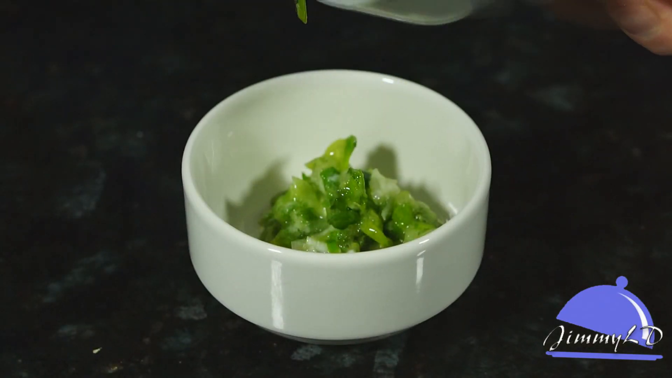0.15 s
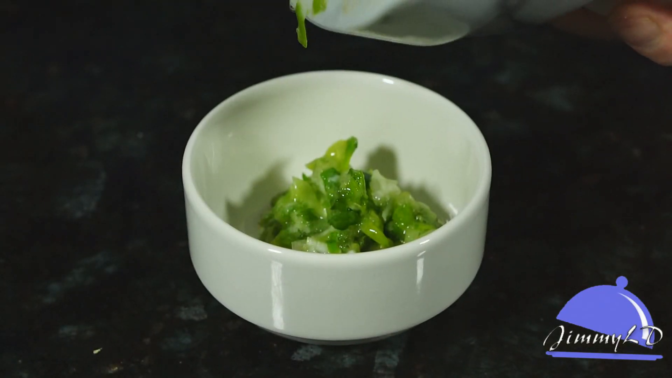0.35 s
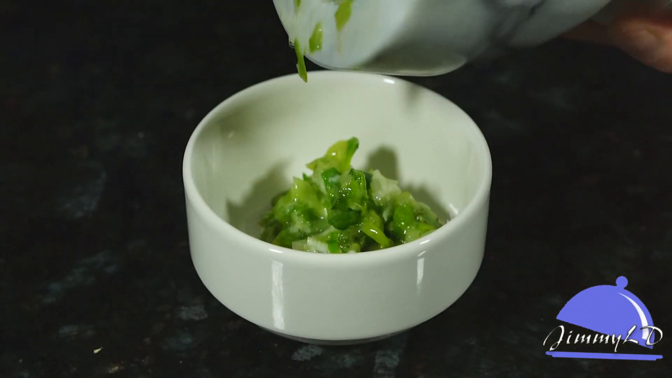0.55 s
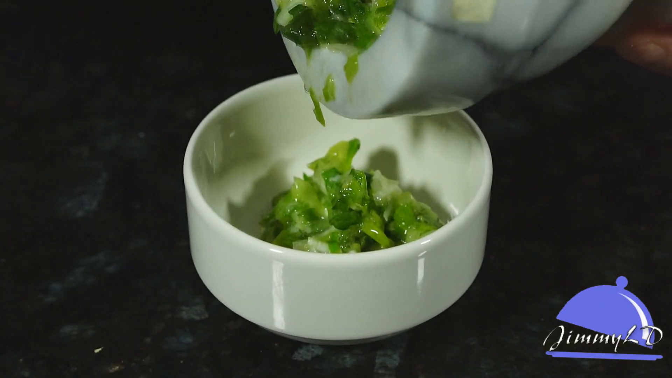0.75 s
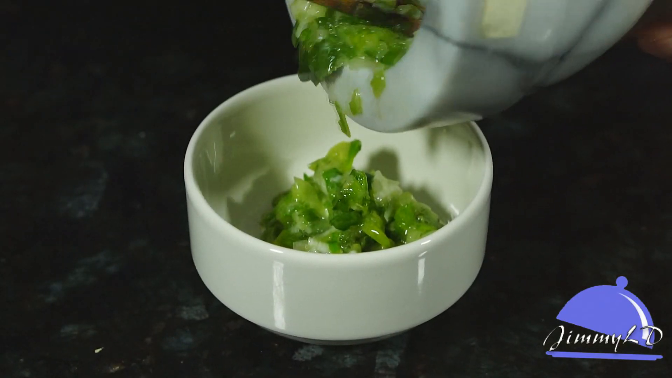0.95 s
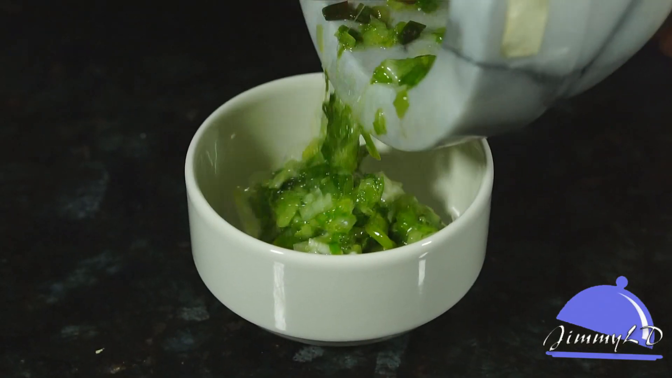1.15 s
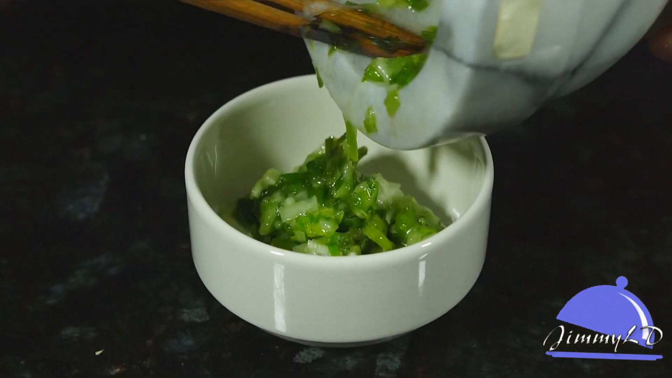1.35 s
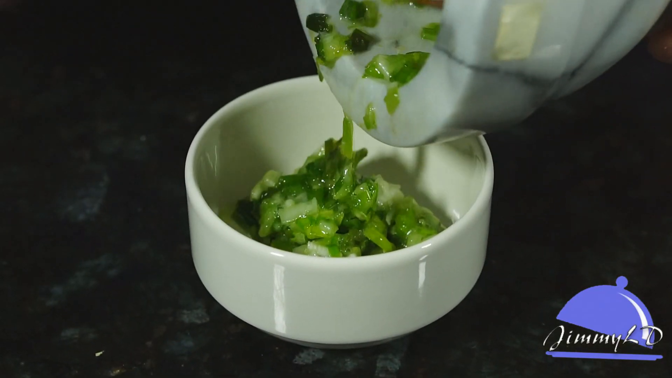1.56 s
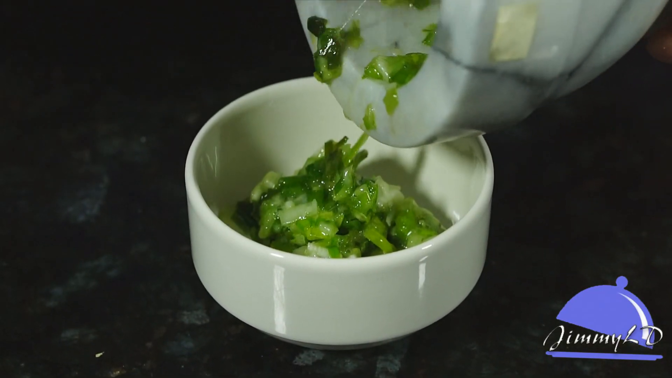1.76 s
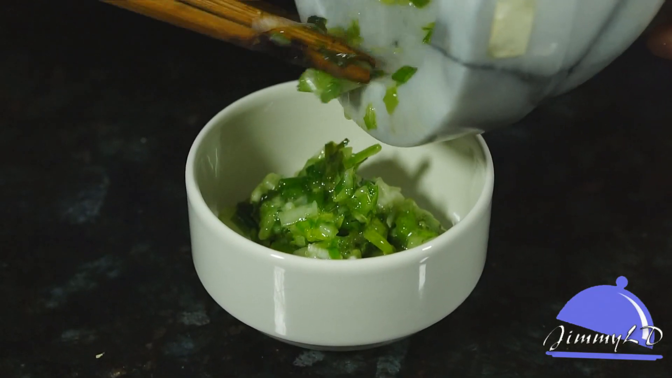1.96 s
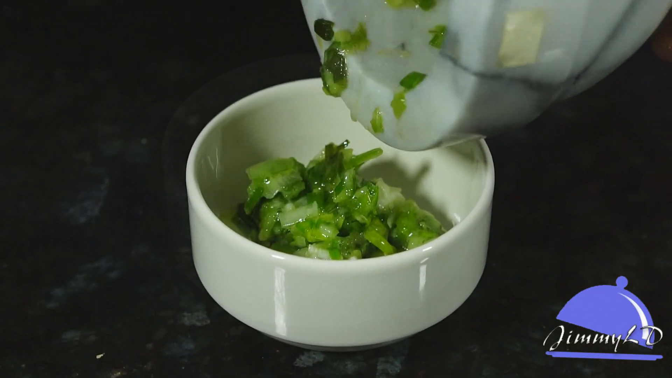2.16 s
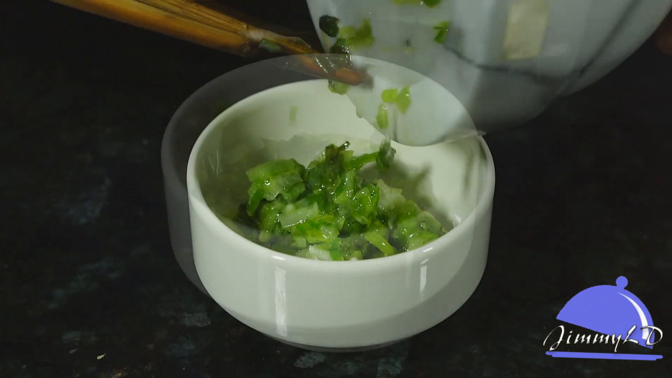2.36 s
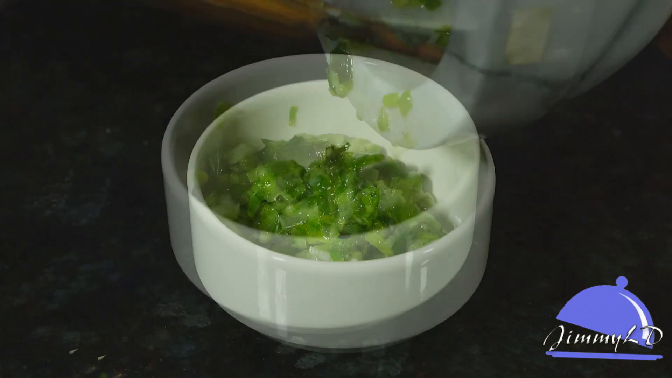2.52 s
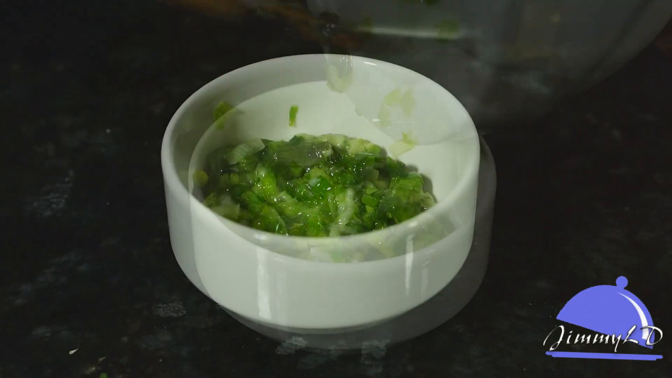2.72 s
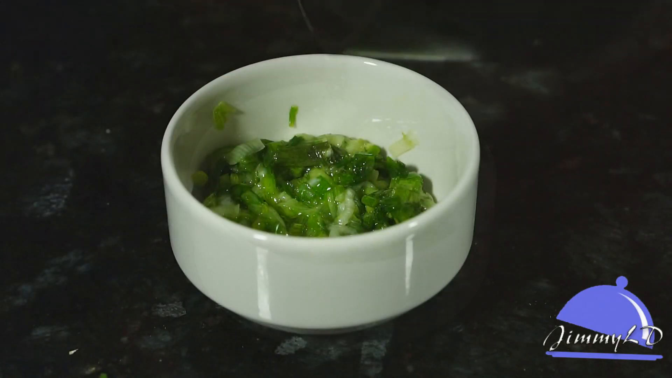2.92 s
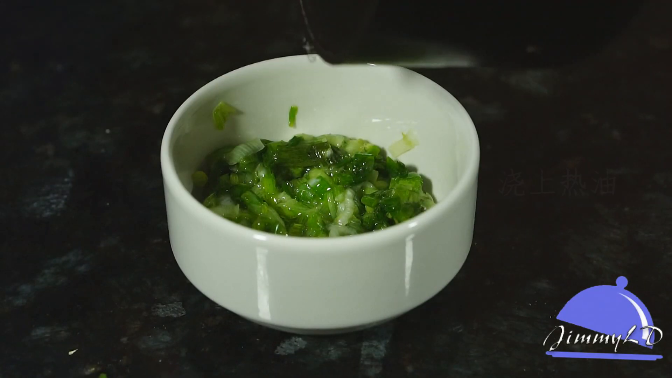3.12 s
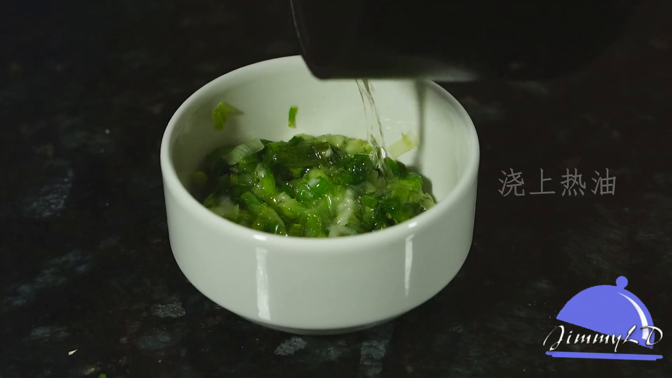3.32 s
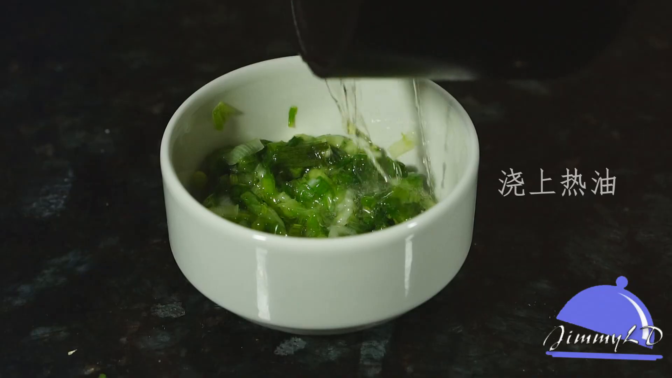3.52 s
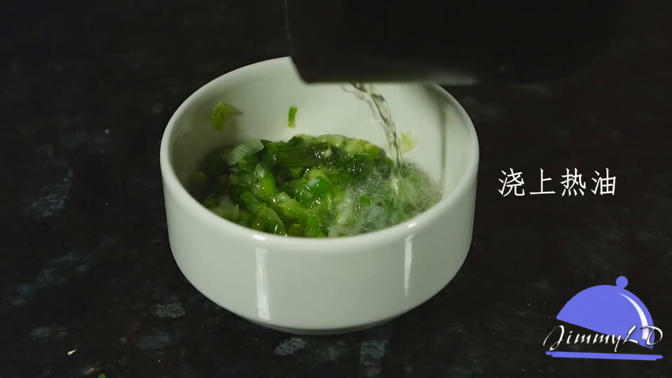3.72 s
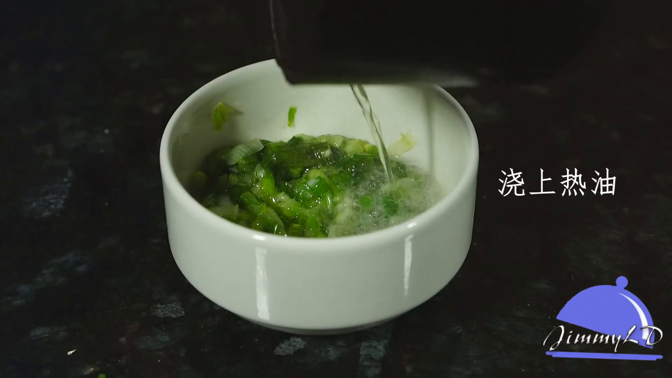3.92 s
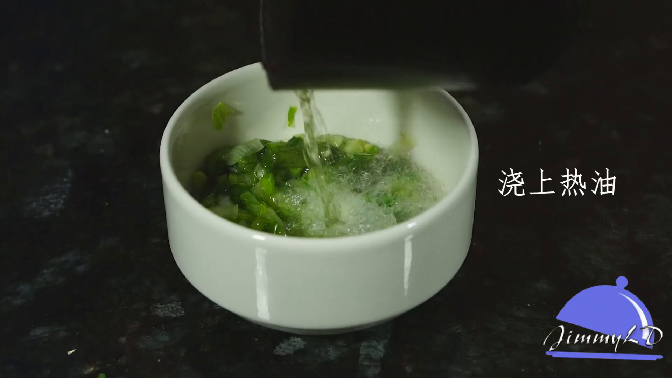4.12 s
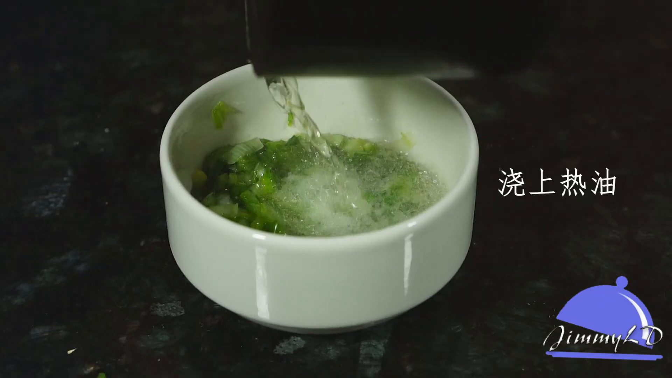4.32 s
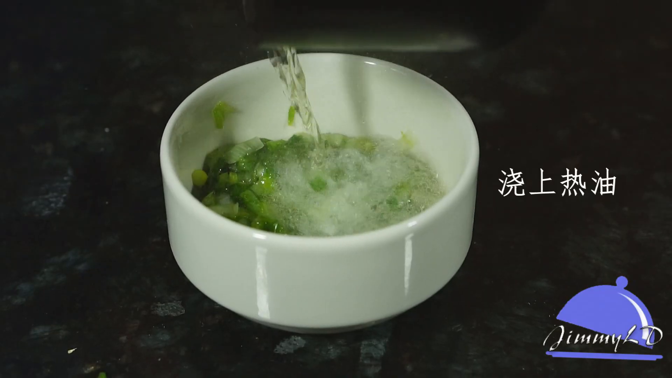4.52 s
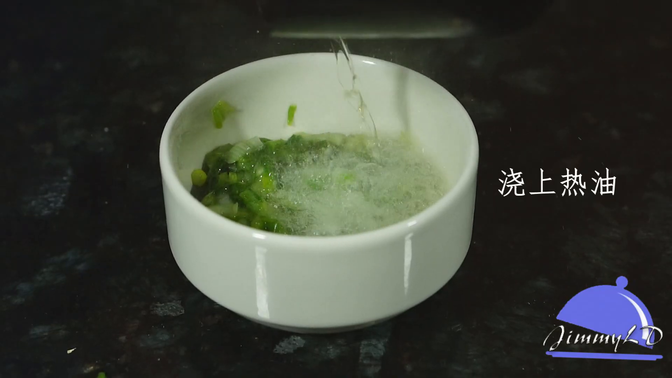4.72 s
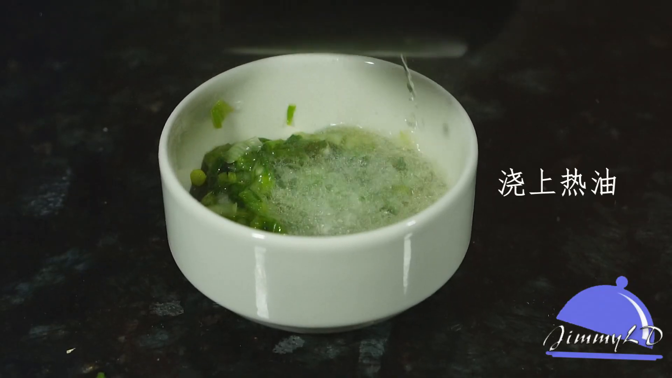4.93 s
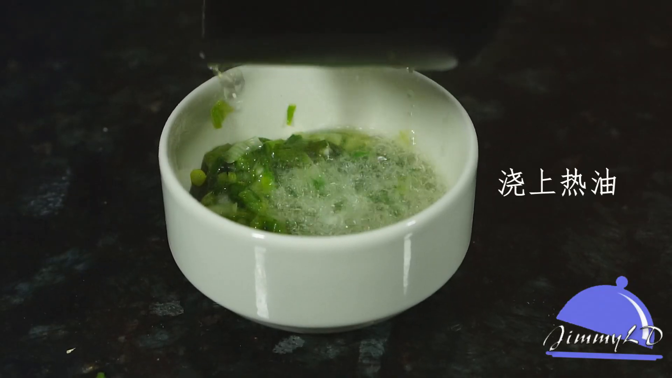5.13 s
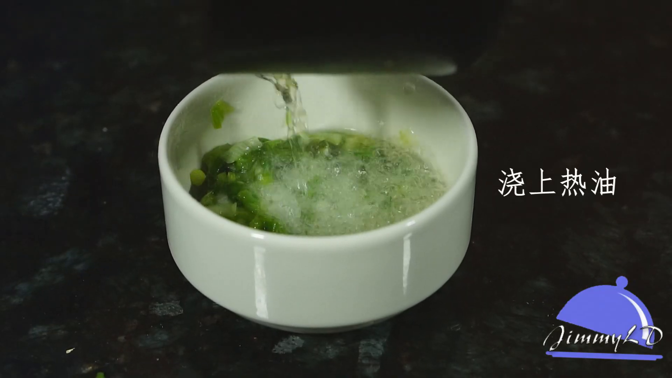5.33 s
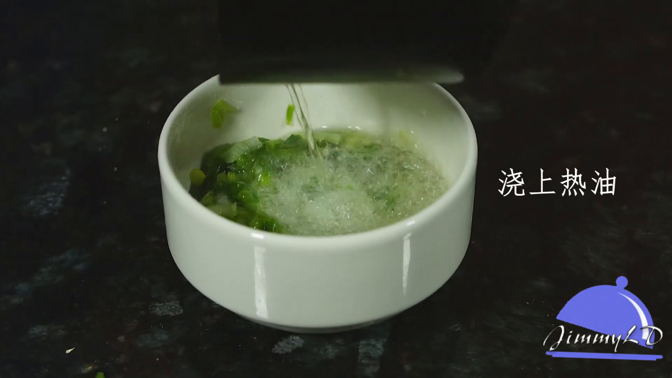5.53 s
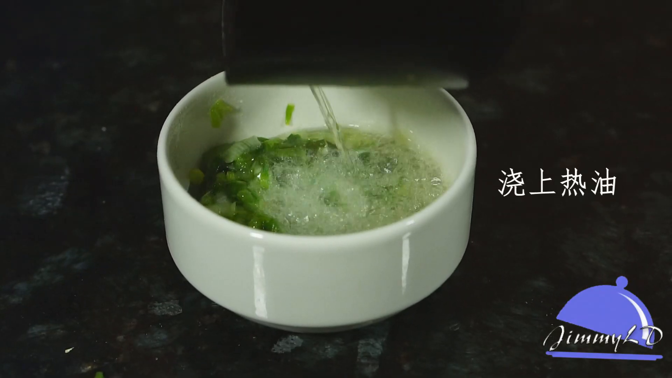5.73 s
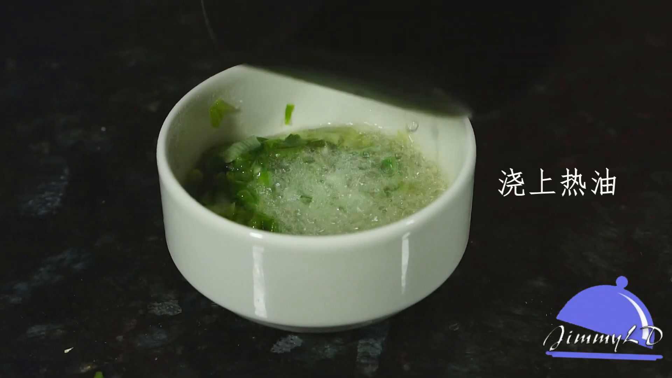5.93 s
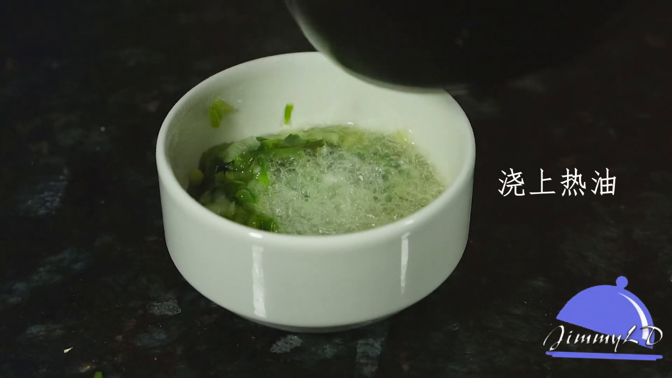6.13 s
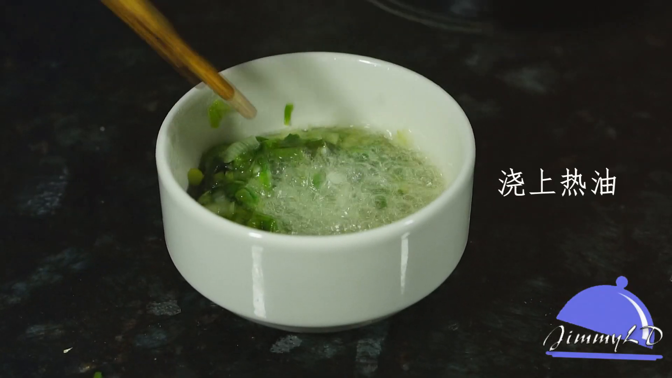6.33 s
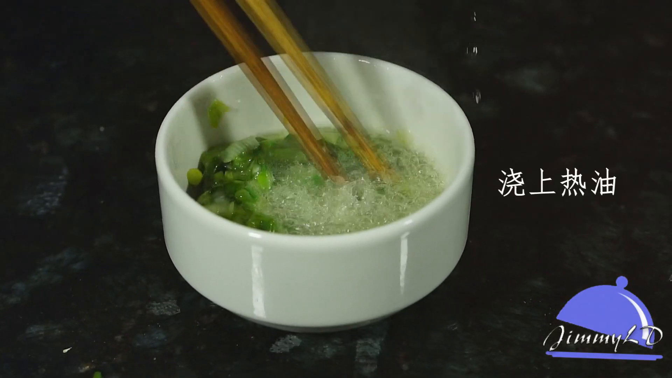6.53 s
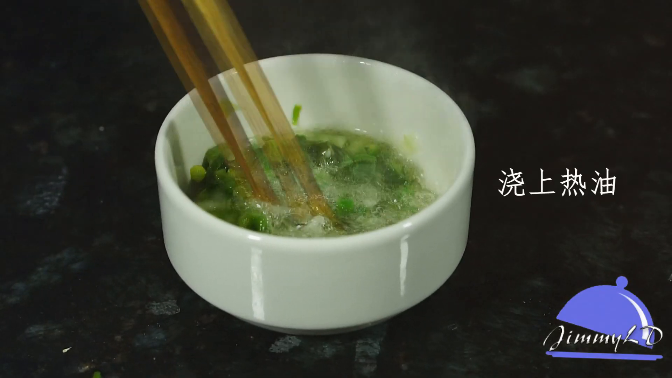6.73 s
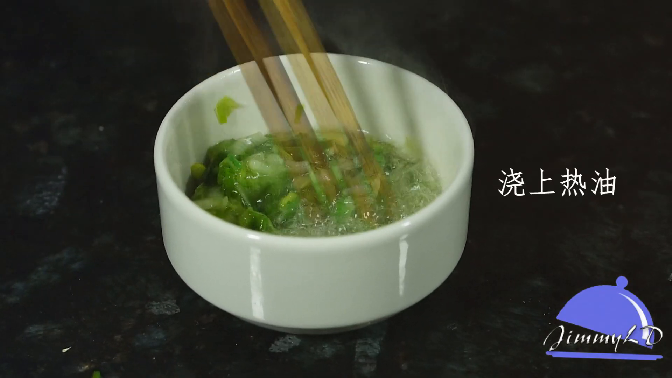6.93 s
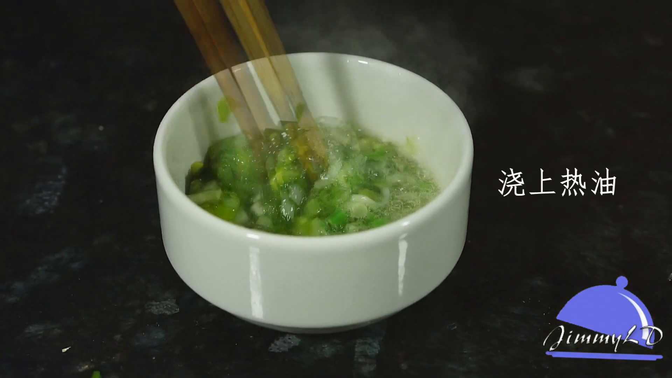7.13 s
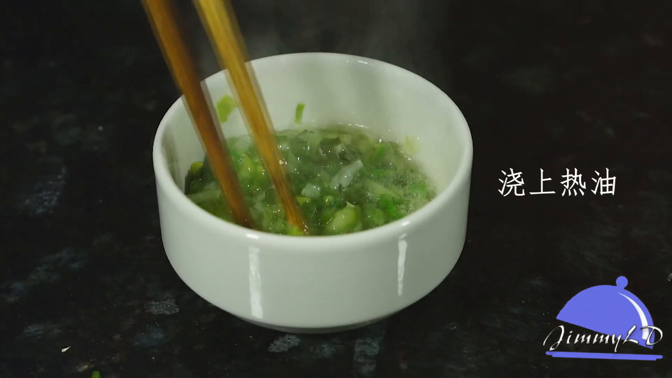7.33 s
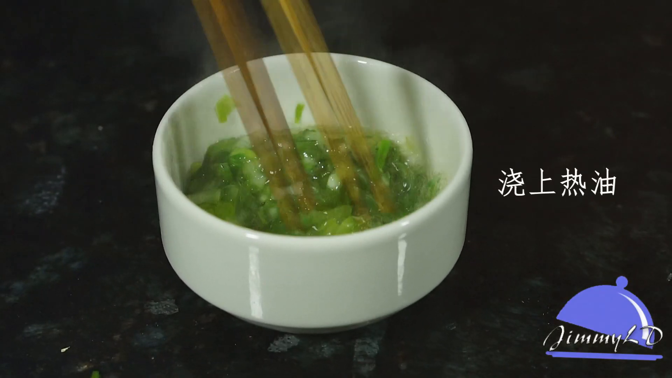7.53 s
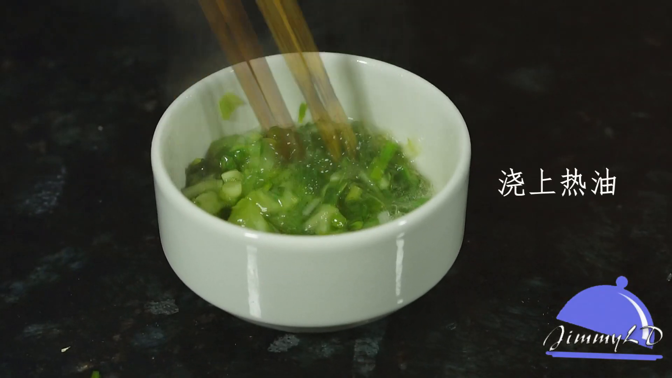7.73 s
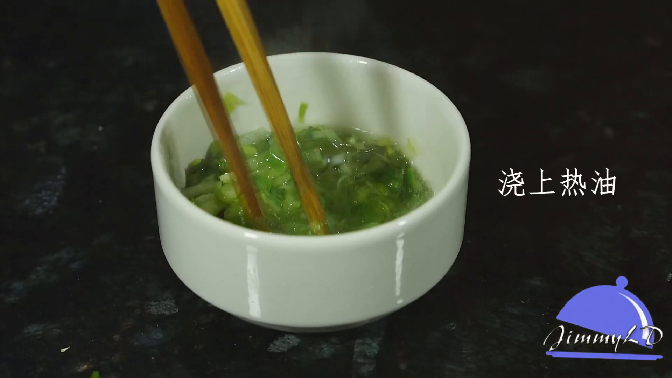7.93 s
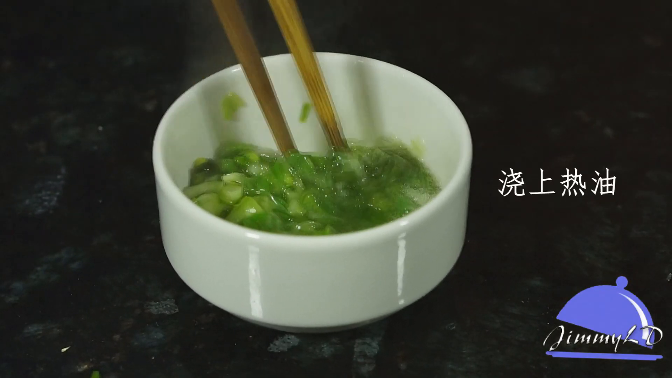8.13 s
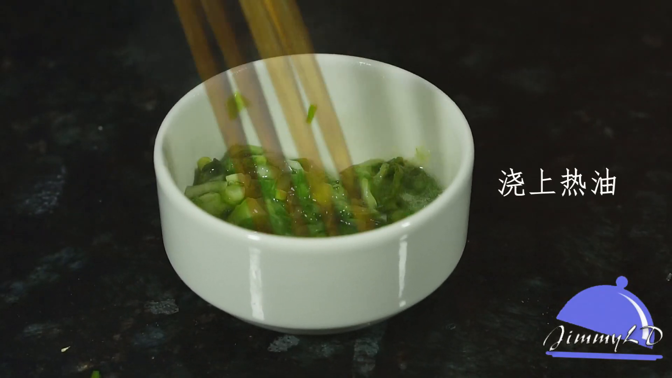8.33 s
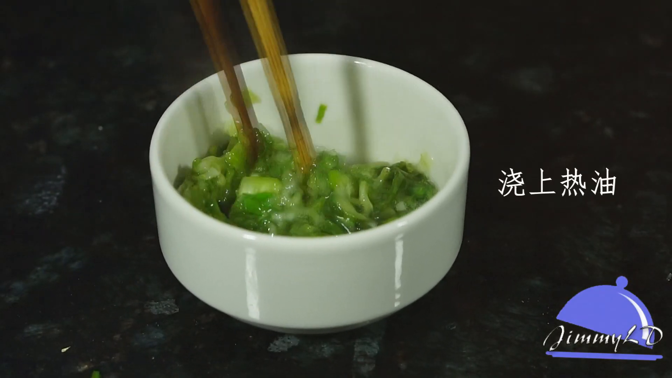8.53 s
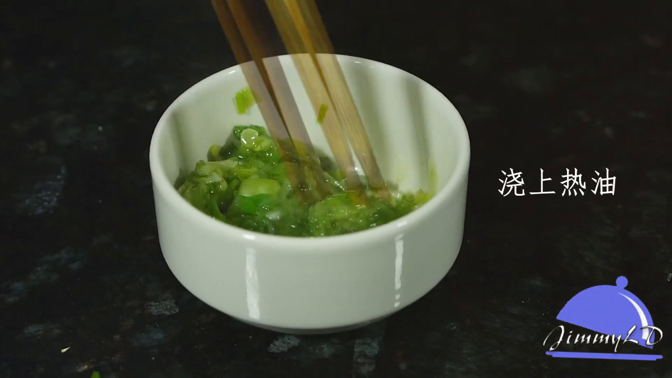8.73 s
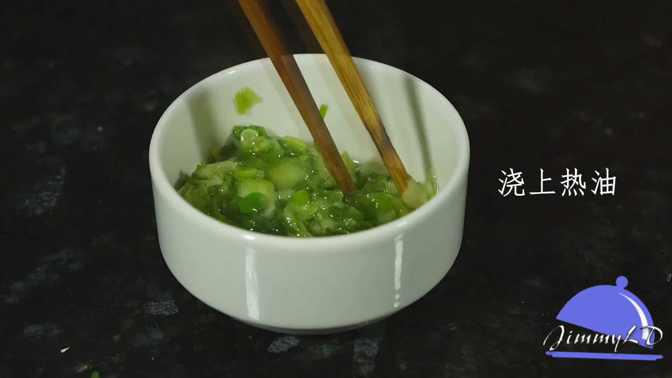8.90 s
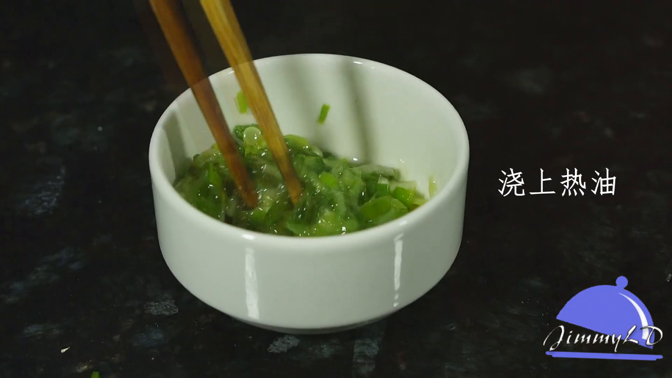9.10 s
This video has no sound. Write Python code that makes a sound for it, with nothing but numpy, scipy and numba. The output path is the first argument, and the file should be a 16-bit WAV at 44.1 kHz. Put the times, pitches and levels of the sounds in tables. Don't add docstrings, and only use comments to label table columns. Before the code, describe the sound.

Wooden sticks knock and scrape a stone mortar over a ringing porcelain bowl, then hot oil sizzles fiercely, spits and fades as it is stirred.

```python
import sys
import numpy as np
from scipy import signal
from scipy.fft import rfft, irfft
from scipy.io import wavfile
from scipy.ndimage import uniform_filter1d
from numba import njit

SR = 44100
rng = np.random.default_rng(int(sys.argv[2]) if len(sys.argv) > 2 else 0)


def log_audio(samples):
    frames = np.atleast_2d(samples).T
    limited = np.clip(frames, -1, 1)
    pcm = np.round(limited * 32767).astype(np.int16)
    wavfile.write(sys.argv[1], SR, pcm)


def nominal_scale(level):
    x = np.asarray(level, float) / 20
    return 10 ** x


N = 408354
HZ = np.arange(N // 2 + 1) * SR / N
T = np.arange(N) / SR
RISE_S = 0.0007


def over_hz(table):
    hz, value = np.transpose(table)
    return np.interp(np.log(HZ + 1), np.log(hz), value)


def over_time(table):
    return np.interp(T, *np.transpose(table))


def unit(x):
    return x / np.sqrt(np.mean(x ** 2))


def noise(own):
    return rng.standard_normal(N) + own * rng.standard_normal((2, N))


def colour(x, spectrum, peaks=(), peak_db=0):
    X = rfft(x)
    power_in = np.mean(abs(np.atleast_2d(X)) ** 2, axis=0)
    flat = np.sqrt(uniform_filter1d(power_in, size=250))
    power = nominal_scale(2 * over_hz(spectrum))
    for hz, width_hz, db in peaks:
        power = power + nominal_scale(2 * (db + peak_db)) / (1 + (2 * (HZ - hz) / width_hz) ** 2) ** 2
    return unit(irfft(X * np.sqrt(power) / flat, N))


def bands(x, edges_hz):
    X = rfft(x)
    below = [1 / (1 + (HZ / hz) ** 6) for hz in edges_hz]
    return [irfft(X * (hi - lo), N) for lo, hi in zip([0] + below, below + [1])]


def walk(rate_hz):
    hold = int(SR / rate_hz)
    steps = np.repeat(rng.standard_normal(N // hold + 1), hold)
    return 1.24 * uniform_filter1d(uniform_filter1d(steps, hold), hold)[:N]


@njit
def rings(s, hz, t60, size, pan):
    out = np.zeros((2, N))
    for k in range(len(s)):
        i = int(s[k] * SR)
        z = size[k] + 0j
        turn = np.exp((2j * np.pi * hz[k] - np.log(1000) / t60[k]) / SR)
        for j in range(i, min(N, i + int(t60[k] * SR) + 2)):
            out[0, j] += (1 + pan[k]) * z.imag
            out[1, j] += (1 - pan[k]) * z.imag
            z *= turn
    return out


def blips(s, hz, t60, db, pan):
    return rings(s, hz, t60, nominal_scale(db), pan) - rings(s, hz, 0.41 * t60, nominal_scale(db), pan)


def grains(count, t0, t1, low_hz, top_hz, cycles, scatter_db, most_db, spread):
    when, pitch, rarity, side = rng.random((count, 4)).T
    hz = low_hz * (top_hz / low_hz) ** pitch
    db = np.minimum(-scatter_db * np.log(1 - rarity), most_db)
    size = nominal_scale(db) * np.sqrt(hz / top_hz)
    return rings(t0 + (t1 - t0) * when, hz, cycles / hz, size, spread * (2 * side - 1))


def room(x, t60, near_db):
    x = signal.sosfilt(signal.butter(3, 875, "high", fs=SR, output="sos"), x)
    t = T[:SR // 2]
    tail = rng.standard_normal((2, len(t))) * np.exp(-np.log(1000) * t / t60) * (t > 0.001)
    tail = tail / np.sqrt(np.sum(tail[0] ** 2))
    return x + nominal_scale(near_db) * signal.fftconvolve(x, tail, axes=1)[:, :N]


# hz, level_db [dB per Hz]
CRACK_SPECTRUM = [(290, -27), (500, -33), (2540, -4), (3500, -6), (4130, 3.5), (4840, -3), (6550, -0.5),
                  (9110, 1), (10700, -2.5), (15500, -7)]


def cracks(s, peak_db, decay_s):
    kick = np.zeros(N)
    np.add.at(kick, (s * SR).astype(int), nominal_scale(peak_db))
    envelope = signal.lfilter([1], [1, -np.exp(-1 / (decay_s * SR))], kick)
    burst = colour(noise(1.8), CRACK_SPECTRUM) * envelope
    return signal.sosfilt(signal.butter(2, 1700, "high", fs=SR, output="sos"), burst)


def thuds(s, db, hz, t60):
    t60 = t60 + 0 * s
    overtone_hz = np.minimum(1.79 * hz, 0.45 * SR)
    overtone = rings(s, overtone_hz, t60, nominal_scale(db + 16 - hz / 60), 0 * s)
    return rings(s, hz, t60, nominal_scale(db), 0 * s) + overtone


# start_s, crack_peak_db, thud_minus_crack_db, thud_hz, click_hz
KNOCKS = [(0.003, -5.5, -24, 1870, 9470), (0.011, -16.5, -13, 1180, 9540), (0.244, -3.5, -14, 1070, 5200),
          (0.2515, -14, -25, 1880, 6950), (0.4425, -4, -21, 3370, 9000), (0.4465, -7.5, -19, 3620, 9100),
          (0.4748, -17, -28, 1920, 9500), (0.661, -8.5, -24.5, 2080, 9540), (0.754, -19, -18, 2500, 7560),
          (0.929, -30, -16, 2430, 10400), (0.9703, -27, -8.5, 1980, 12000), (1.413, -26, -18, 2300, 9300),
          (1.432, -32, -24, 1140, 10800), (1.651, -13, -13, 2380, 5530), (2.018, -12, -39, 2900, 9900),
          (2.363, -17, -29, 2080, 10000), (2.3652, -15.5, -24.5, 2080, 12000),
          (2.3685, -25, -30, 2080, 8100), (2.688, -21.5, -26, 1980, 9900), (2.916, -20, -24, 1740, 9660),
          (2.922, -33, -6, 1900, 10400), (3.12, -32, -20, 1640, 10400)]


def knocks():
    s, db, thud_db, thud_hz, click_hz = np.transpose(KNOCKS)
    s = s + RISE_S
    click_db = -25 + 0.78 * (db + 17)
    click = rings(s, click_hz, 0.0049 + 0 * s, nominal_scale(click_db), 0 * s)
    crack = cracks(s, db - 12.0, 0.0016)
    thud = thuds(s, db + thud_db - 0.5, thud_hz, 0.017)
    return room(crack + click + thud, 0.11, -8.0)


# start_s, slide_s, stone_db, speed_db [hiss over stone]
STROKES = [(0.021, 0.075, -53, 10.5), (.262, 0.017, -49.5, 11.5), (0.499, 0.044, -58, 15),
           (.712, 0.019, -64, 13.5), (.765, .025, -74, 17), (0.937, 0.12, -61, 15), (1.42, 0.054, -64, 4),
           (1.665, 0.12, -58.5, 2), (2.03, 0.053, -63, 8.5), (2.378, 0.052, -65, 13), (2.93, 0.036, -67, 3)]
# hz, level_db [dB per Hz]
STONE_SPECTRUM = [(180, -64), (300, -27), (600, -32), (794, -7.5), (1090, -11), (1540, -12), (1810, -5),
                  (3020, -6.5), (4350, 0.5), (6360, -2), (9450, 4.5), (13800, 4.5), (15500, 0)]
LIFT_DB_S = [98, 135, 500]


def scrape():
    grip_s, sag_db_s = 0.014, 38
    grit = grains(count=30000, t0=0, t1=3.3, low_hz=395, top_hz=17300, cycles=11.0,
                  scatter_db=5.0, most_db=-1, spread=0.92)
    grit = colour(room(grit, 0.056, 0.65), STONE_SPECTRUM)
    parts = [unit(part) for part in bands(grit, [3000, 8000])]
    judder_db = 1.5 * walk(70)
    out = 0
    for start, slide, db, speed_db in STROKES:
        t = T - start
        level_db = judder_db + db - sag_db_s * np.clip(t, 0, slide)
        bite = np.clip(t / grip_s + 0.5, 0, 1) * nominal_scale(level_db)
        over_stone_db = (0, -10 + 1.13 * speed_db, speed_db)
        for part, over_db, lift in zip(parts, over_stone_db, LIFT_DB_S):
            out = out + part * bite * nominal_scale(over_db - lift * np.maximum(t - slide, 0))
    return out


# pitch_hz, level_db
BOWL_MODES = [
    (4243, 2.5),
    (4259, -15),
    (10340, -23),
]
# start_s, level_db, t60_s
BOWL_BLOWS = [(0.441, -38, 0.25), (0.4738, -38.5, 0.5), (.52, -40, .25), (0.661, -20.5, 0.11),
              (.662, -30, .33), (0.756, -34.5, 0.33), (0.969, -37.5, 0.3), (1.412, -50, 0.5),
              (1.651, -31, 0.3), (2.0176, -39.5, 0.38), (2.689, -54, 0.33), (2.9168, -46, 0.44)]
# start_s, end_s
DAMPED_S = (.736, .755)


def bowl():
    energy = sum((T > s + RISE_S) * nominal_scale(2 * db - 120 * np.abs(T - s) / t60) for s, db, t60 in BOWL_BLOWS)
    touched = 1.0 * (T > DAMPED_S[0]) * (T < DAMPED_S[1])
    held_db = -9 * uniform_filter1d(touched, size=200) + 1.3 * walk(80)
    tone = sum(nominal_scale(db - 5.5) * np.sin(2 * np.pi * hz * T) for hz, db in BOWL_MODES)
    sides = np.array([[1.08], [0.92]])
    return room(sides * tone * np.sqrt(energy) * nominal_scale(held_db), 0.2, -16)


# pitch_hz, width_hz, level_db
HOLLOW_MODES = [(965, 490, -2.5), (2080, 260, -3.5)]
# start_s, level_db
BOOMS = [(0.012, -42), (.25, -40.5), (.67, -58), (.97, -52.5)]


def hollow():
    murmur = colour(noise(0.5), [(300, -44), (9000, -40)], HOLLOW_MODES)
    fade = sum((T > s) * nominal_scale(db - 74 * np.abs(T - s)) for s, db in BOOMS)
    return room(murmur * fade * nominal_scale(2.2 * walk(58.7)), 0.08, -11)


# start_s, change_db, foam_change [0-1 scale]
GUSHES = [(3.49, 1, 0.47), (3.70, 4, -0.26), (3.82, 4, -0.036), (3.95, 2, -0.13), (4.171, 3.5, 0.29),
          (4.3, 2.5, 0.16), (4.385, -2.5, 0.058), (4.5, 3.5, 0.33), (4.69, 0, 0.22), (4.911, 4, 0.13),
          (5.35, 6.5, -0.71), (5.45, 2.5, -0.14), (5.53, -2.5, 0.015), (5.56, 3.5, 0.2), (5.69, 0.5, 0.18),
          (5.8, 1.5, -0.074), (6.17, -0.5, -0.43), (6.92, 0.5, -0.33)]


def gushes():
    rise_s, fade_s = 0.015, 0.12

    def flare(s):
        return np.clip((T - s) / rise_s, 0, 1) * np.exp(-np.maximum(T - s, 0) / fade_s)

    return sum(np.outer(change, flare(s)) for s, *change in GUSHES)


# time_s, vigour_db, foam [0 dry steam - 1 wet bubbles]
FRY = [(3.386, -49, 0.2), (3.41, -34.5, 0.04), (3.464, -38, 0), (3.476, -27.5, 0), (3.68, -28.5, 0.27),
       (4.13, -25.5, 0.57), (4.8, -21.5, 0.41), (4.89, -25.5, 0.83), (5.34, -26, 0.86), (5.6, -26, 0.87),
       (6.1, -24.5, 1), (6.5, -30, 1), (7.03, -30, 0.97), (7.7, -39, 1), (8.45, -47.5, 0.67),
       (8.95, -55.5, 0.47), (9.26, -58.5, 0.24)]
# dry_db [over vigour], foam_db [added by full foam]
LAYERS = [
    (-24, 8.5),
    (-13, 9.5),
    (-16, 10.5),
    (4, -4),
]
# time_s, share [0-1]
LONE = [(3.38, 0.87), (3.6, 0.04), (4.6, 0), (6.2, 0.08), (6.5, 0.36), (7.8, 0.36), (9.26, 0)]
# hz, level_db [dB per Hz]
OIL_SPECTRUM = [(20, -40), (180, -26), (320, -20.5), (600, -14), (1000, -1.5), (1600, -5.5), (2100, -2.5),
                (3560, -1.5), (3760, -4), (5800, -4), (7700, 0.5), (8900, -2.5), (10300, -0.5),
                (13600, -20)]
# pitch_hz, width_hz, level_db
BOWL_AIR = [(617, 157, -2.5), (1150, 110, -5), (1980, 170, -5), (2144, 155, 3), (2900, 910, 1),
            (3250, 140, 0), (3450, 340, -3), (7800, 620, -11), (11920, 4000, 3.5), (14900, 1930, 3)]
# pitch_hz, width_hz, level_db
SING = [(1550, 160, 0), (1707, 62, 9), (1860, 22, 13), (3100, 190, -3), (4480, 640, -0.5)]
# time_s, level_db [over vigour]
SING_DB = [(5.9, -32), (6.4, -11), (8.3, -15), (9.26, -21)]


def fry():
    s, vigour_db, foam = np.transpose(FRY)
    vigour_db, foam = gushes() + [np.interp(T, s, vigour_db), np.interp(T, s, foam)]
    levels_db = [vigour_db + dry_db + foam_db * foam for dry_db, foam_db in LAYERS]
    dense = grains(count=90000, t0=3.38, t1=9.26, low_hz=299, top_hz=15540, cycles=14.5,
                   scatter_db=3.5, most_db=10.5, spread=0.056)
    sparse = grains(count=4000, t0=3.38, t1=9.26, low_hz=1980, top_hz=16600, cycles=6.0,
                    scatter_db=2.0, most_db=14, spread=0.19)
    share = np.clip(over_time(LONE), 0, 1)
    mix = room(np.sqrt(1 - share) * unit(dense) + np.sqrt(share) * unit(sparse), 0.18, -3.0)
    churn = nominal_scale(-7.5) * noise(0.13)
    sizzle = colour(mix + churn, OIL_SPECTRUM, BOWL_AIR, -2.8)
    sizzle = sum(part * nominal_scale(1.0 * walk(14)) for part in bands(sizzle, [2700, 3350, 5900, 11800]))
    surge_db = 0.35 * walk(25) + 0.86 * walk(160)
    layers = 0
    for part, db in zip(bands(sizzle, [1400, 3800, 6500]), levels_db):
        layers = layers + unit(part) * nominal_scale(db + surge_db + 0.6 * walk(6.2))
    sing = colour(mix, [(300, -50), (9000, -43)], SING) * nominal_scale(vigour_db + over_time(SING_DB))
    on = 0.59 * np.clip((T - s[0]) / 0.0034, 0, 1)
    return on * (sing + layers)


# start_s, bubble_db, bubble_hz, crack_db,
# crack_hz
SPITS = [(3.3965, -49, 3500, -36, 9900), (3.469, -32, 3015, -23, 9960),
         (4.5005, -26, 3300, -14, 7490), (4.7795, -26, 3300, -14, 7000),
         (6.7299, -18, 3000, -23, 6000),
         (3.5149, -20.5, 2730, -28, 14360), (3.5438, -22, 3120, -22, 14450),
                (3.5659, -31, 2730, -22, 7920), (3.5816, -35, 2670, -27, 11950),
                (3.5995, -38, 4350, -23, 9710), (3.6085, -29, 2780, -28, 15030),
                (3.6427, -30, 4260, -18, 7450), (3.7143, -17, 3040, -22, 7920),
                (3.7466, -30, 5210, -23, 9670), (3.7783, -27, 3120, -27, 7100),
                (3.8905, -37, 5040, -18, 12400), (4.0599, -39, 1640, -17, 12490),
                (4.0954, -42, 4290, -19, 11900), (4.1669, -13.5, 4180, -27, 14280),
                (4.4273, -23, 3290, -17, 7320), (4.4664, -33, 2090, -18, 10470),
                (4.8653, -32, 5100, -13, 14660), (5.0285, -15.5, 3250, -15, 7000),
                (5.0383, -22, 2020, -17, 15160), (5.0618, -17, 3510, -15, 7390),
                (5.0679, -31, 4290, -19, 11910), (5.0946, -26, 3450, -17, 7500),
                (5.1151, -31, 5150, -17, 10230), (5.2244, -24, 3940, -18, 14360),
                (5.275, -24, 3210, -23, 10310), (5.2939, -36, 1940, -23, 8870),
                (5.3017, -38, 2110, -28, 6800), (5.3253, -28, 2950, -22, 11690),
                (5.3543, -14.5, 4150, -36, 6140), (5.368, -32, 3270, -14, 11350),
                (5.5367, -33, 5380, -17, 14580), (5.5548, -30, 2120, -18, 12270),
                (5.5884, -32, 1790, -22, 14640), (5.6618, -26, 2970, -11, 14690),
                (5.7262, -30, 2800, -13, 12250), (5.7654, -31, 3060, -15, 12400),
                (5.8096, -28, 5340, -19, 8140), (5.8849, -13.5, 3440, -27, 12660),
         (5.9102, -27, 1980, -18, 10530), (6.1156, -18, 2820, -24, 14660),
                 (6.2656, -33, 1980, -21, 12680), (6.2833, -33, 2800, -25, 10100),
                 (6.3015, -22, 3060, -32, 11800), (6.3163, -22, 3980, -31, 9470),
                 (6.3264, -30, 1890, -21, 10870), (6.3612, -33, 5220, -22, 9160),
                 (6.3781, -17, 3340, -25, 7800), (6.4038, -23, 3220, -12, 13310),
                 (6.4226, -29, 5790, -19, 8330), (6.4355, -16, 2770, -29, 6890),
                 (6.4642, -12.5, 3600, -26, 7580), (6.4849, -17, 3200, -31, 6350),
                 (6.5078, -33, 1810, -24, 10290), (6.5422, -23, 2900, -26, 7320),
                 (6.5529, -30, 2670, -21, 11050), (6.613, -36, 5340, -26, 10600),
                 (6.623, -17, 3640, -34, 6700), (6.6471, -22, 3640, -19, 10400),
                 (6.703, -31, 5000, -22, 6090), (6.8039, -33, 1920, -20, 7900),
                 (6.88, -33, 2260, -18, 11860), (6.8942, -20, 2900, -24, 6830),
                 (6.9304, -22, 5600, -20, 5900), (6.9918, -14, 4970, -21, 6100),
                 (7.0177, -21, 4520, -24, 14970), (7.0502, -33, 4350, -29, 9840),
                 (7.0566, -24, 3870, -30, 6290), (7.0793, -36, 5060, -18, 14640),
                 (7.1241, -26, 5340, -22, 7900), (7.1407, -13.5, 3700, -32, 6120),
                 (7.1589, -37, 3940, -27, 12020), (7.1821, -31, 3730, -27, 7300),
         (7.2003, -35, 5050, -21, 9780), (7.2282, -17, 4800, -30, 5890),
              (7.2407, -21, 4010, -35, 5940), (7.2912, -21, 3100, -32, 7710), (7.334, -24, 3220, -17, 7800),
              (7.3408, -25.5, 1830, -10, 14200), (7.3985, -29, 3700, -26, 7710),
              (7.4052, -37, 5510, -22, 10210), (7.4114, -38, 2800, -20, 7000),
              (7.4263, -20, 3300, -36, 5810), (7.4767, -26, 3420, -27, 15400),
              (7.5243, -31, 5340, -27, 11800), (7.5789, -34, 3240, -25, 7580),
              (7.5863, -28, 4540, -25, 9650), (7.616, -41, 3490, -26, 13820),
              (7.6269, -42, 5580, -26, 10830), (7.6424, -21, 5060, -40, 6980),
              (7.713, -27, 3100, -43, 12200), (7.732, -24.5, 3400, -34, 6420),
              (7.781, -19.5, 3180, -38, 6220), (7.788, -31, 1850, -43, 5810),
              (7.7949, -30, 2760, -24, 9700), (7.808, -42, 1590, -31, 12020),
              (7.8607, -28, 3210, -18, 15460), (7.8697, -43, 3155, -27, 10190),
              (7.8993, -28, 4540, -26, 6720), (7.9369, -47, 2220, -35, 8030),
              (7.9469, -41, 1920, -30, 13700), (8.0895, -36, 2730, -34, 6920),
              (8.1033, -45, 1630, -37, 7050), (8.1716, -39, 4440, -46, 8200), (8.201, -45, 4460, -36, 8510)]


def spits():
    s, db, hz, crack_db, crack_hz = np.transpose(SPITS)
    pan = 0.15 * rng.standard_normal(len(s))
    note = blips(s, hz, 10 / hz, db + 7.5, pan)
    overtone = rings(s, 1.63 * hz, 0.0012 + 0 * s, nominal_scale(db + 3.5), pan)
    crack = blips(s, crack_hz, 0.0018 + 0 * s, crack_db + 7, pan)
    edge = rings(s, 8000 + 0 * s, 0.0004 + 0 * s, nominal_scale(crack_db + 8), pan)
    return room(note + overtone + crack + edge, 0.072, -4.5)


# start_s, peak_db, pitch_hz, t60_s
TAPS = [(6.728, -19.5, 1010, 0.011), (8.2215, -29, 4500, .003), (8.222, -28, 2000, .004),
        (8.278, -32, 880, 0.02), (8.279, -35, 590, .025), (8.312, -26.5, 3000, .003),
        (8.3135, -31, 4600, .003), (8.345, -31, 3200, .003), (8.345, -28, 5400, .003),
        (8.4998, -19.5, 4500, 0.0033), (8.501, -23, 2920, .007), (8.501, -18, 1016, .02),
        (8.957, -31, 4760, .005), (8.9562, -33, 3050, 0.0054), (9.217, -37, 7000, .006),
        (9.234, -32, 10100, .005)]


def taps():
    s, db, hz, t60 = np.transpose(TAPS)
    dull = hz < 1500
    left = 0.12 + 0 * s
    edge = rings(s, hz, 0.0013 + 0 * s, nominal_scale(db - 1.5) * ~dull, left)
    note = blips(s, hz, t60, db, left)
    knock = blips(s[dull], hz[dull], 0.4 * t60[dull], db[dull] + 1.5, left[dull])
    return room(note + edge, 0.2, -2.5) + room(knock, 0.45, -0.67)


# start_s, end_s, pitch_hz, width_hz, level_db
SWELLS = [(1.42, 1.7, 510, 470, -62), (3.475, 3.6, 3040, 830, -36), (3.6, 4.3, 4400, 244, -40),
          (5.84, 6.25, 374, 180, -53), (3.3, 4.1, 60, 90, -78), (4.88, 5.07, 2500, 1300, -33),
          (4.5, 4.62, 2900, 1300, -35), (7.4, 8.1, 170, 63, -73), (9.3, 8.8, 880, 190, -69),
          (8.9, 9.15, 152, 44, -77), (3.47, 3.4, 2900, 900, -52), (8.24, 8.405, 510, 370, -60),
          (8.483, 8.62, 450, 310, -61)]


def swells():
    rush = rfft(noise(0.34))
    out = 0
    for start, end, hz, width_hz, db in SWELLS:
        arch = np.sin(np.pi * np.clip((T - start) / (end - start), 0, 1))
        band = unit(irfft(rush / (1 + (2 * (HZ - hz) / width_hz) ** 4), N))
        out = out + nominal_scale(db) * arch * band
    return out


# hz, level_db [dB per Hz]
FAN_SPECTRUM = [(65, -54), (110, -26), (414, -8.5), (786, -11), (1140, -3), (1560, -11.5), (2460, -11),
                (3020, -16.5), (4210, -15), (4960, -19), (7830, -18), (9830, -9.5), (15500, -17)]
# pitch_hz, width_hz, level_db
DUCT = [(400, 100, -5), (900, 90, -3), (1160, 75, -1), (2410, 180, -6), (4250, 100, -8), (5530, 90, -5),
        (9700, 80, 2), (10350, 80, -6), (10700, 70, 0), (13620, 70, -4)]
# time_s, level_db
FAN_DB = [(0, -54.5), (1.4, -53), (1.52, -51), (1.65, -53.5), (2.4, -53.5), (2.9, -58), (3.25, -72),
          (3.5, -64), (8.5, -56.5), (9.26, -70)]
# hz, alike [0-1]
FAN_ALIKE = [(60, 0.12), (130, 0.9), (290, 0.7), (640, -0.012), (1410, 0.089), (3100, 0.029), (6820, 0.27),
             (15000, -0.18)]
# hz, left_minus_right_db
FAN_LEFT = [(60, 6), (110, -7), (200, 2), (380, 1.5), (700, 0.5), (1290, 4), (2380, 1.5), (4400, 5),
            (8120, 7.5), (15000, 5)]
# hz, level_db [dB per Hz]
STILL_SPECTRUM = [(20, -14), (100, -16.5), (250, -10), (600, -7.5), (1500, -9.5), (6000, -17), (10000, -15),
                  (15000, -19)]
# pitch_hz, width_hz, level_db
HUM = [(161, 47, -12.5), (880, 110, -11), (3050, 200, -20), (4500, 400, -13)]
# time_s, level_db
STILL_DB = [(2.2, -70), (3.1, -65), (3.5, -62.5), (7, -58.5), (9.26, -63)]


def kitchen():
    common, own = rng.standard_normal(N), rng.standard_normal((2, N))
    alike = np.clip(over_hz(FAN_ALIKE), 0, 1)
    air = irfft(np.sqrt(alike) * rfft(common) + np.sqrt(1 - alike) * rfft(own), N)
    lean = nominal_scale(over_hz(FAN_LEFT) * np.array([[0.5], [-0.5]]))
    fan = irfft(lean * rfft(colour(air, FAN_SPECTRUM, DUCT, 0.4)), N)
    still = colour(noise(1.7), STILL_SPECTRUM, HUM)
    return fan * nominal_scale(over_time(FAN_DB)) + still * nominal_scale(over_time(STILL_DB) + 0.34 * walk(1.4))


# pitch_hz, width_hz, level_db
MOTOR = (900, 180, -71.5)


def motor():
    throb_hz, throb_peak_s, throb_db = 24.6, 3.235, 6
    hz, width_hz, db = MOTOR
    murmur = unit(irfft(rfft(noise(0.63)) / (1 + (2 * (HZ - hz) / width_hz) ** 2), N))
    return murmur * nominal_scale(db + throb_db * np.cos(2 * np.pi * throb_hz * (T - throb_peak_s)))


# hz, left_minus_right_db
OIL_LEFT = [(150, 0), (500, 0.5), (1000, 0.2), (2000, -0.6), (4000, 3.5), (8000, 0.5), (15000, 3.5)]


def scene():
    left = np.array([[0.5], [-0.5]])
    mortar = knocks() + scrape() + bowl() + hollow()
    oil = fry() + spits() + taps() + swells()
    oil = irfft(rfft(oil) * nominal_scale(over_hz(OIL_LEFT) * left), N)
    return mortar * nominal_scale(2.8 * left) + oil + kitchen() + motor()


def roll_off(x):
    return signal.sosfilt(signal.butter(12, 17010, fs=SR, output="sos"), x)


def record(dry):
    mix = signal.sosfilt(signal.ellip(14, 0.3, 55, 15760, fs=SR, output="sos"), dry)
    return roll_off(mix)


dry = scene()
out = record(dry)
log_audio(out)
```